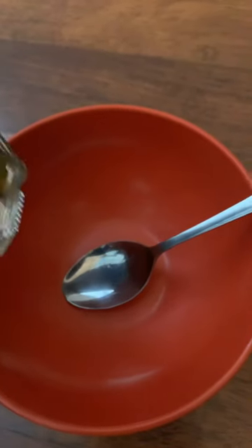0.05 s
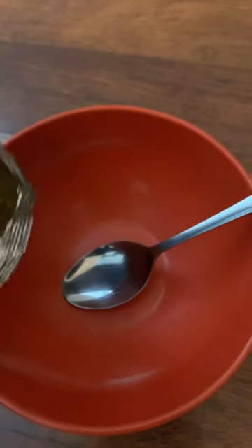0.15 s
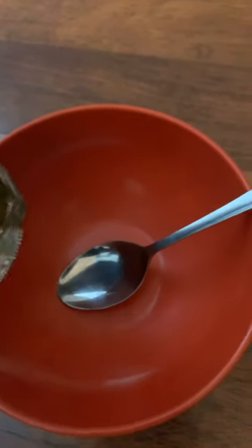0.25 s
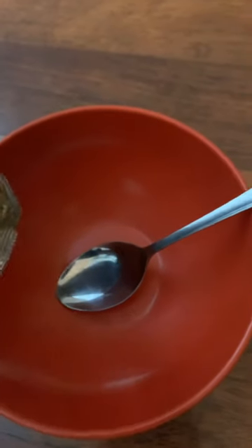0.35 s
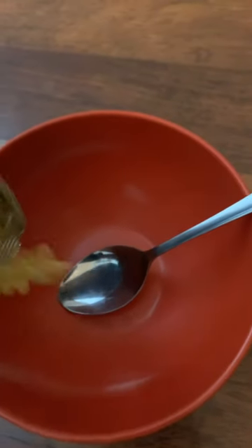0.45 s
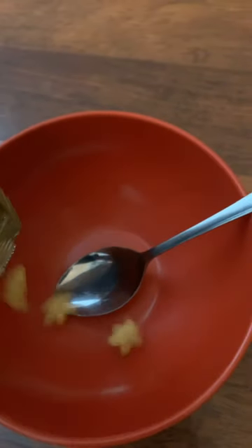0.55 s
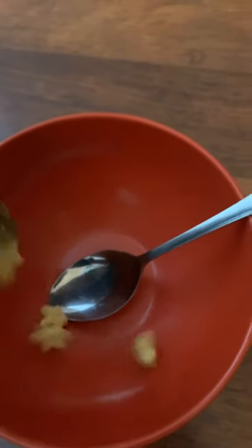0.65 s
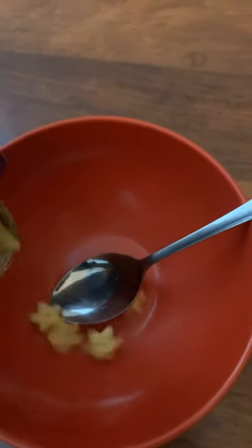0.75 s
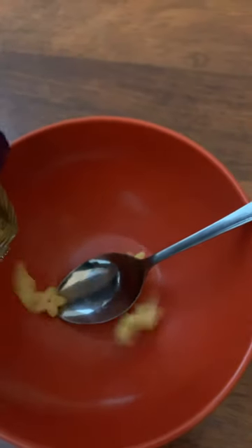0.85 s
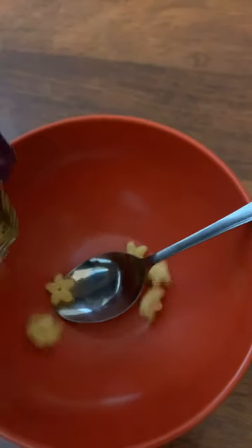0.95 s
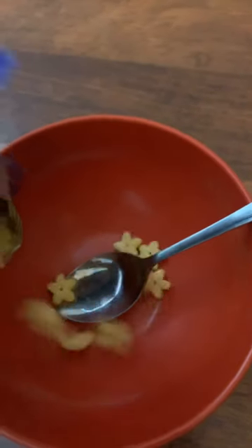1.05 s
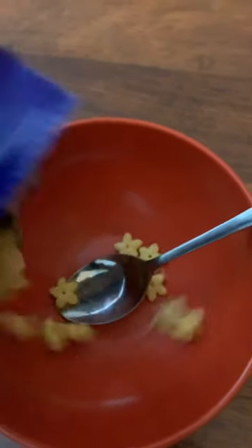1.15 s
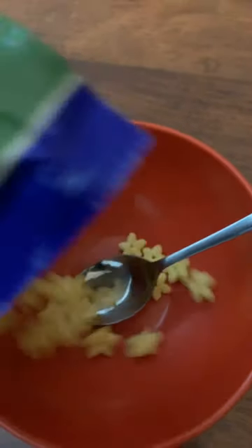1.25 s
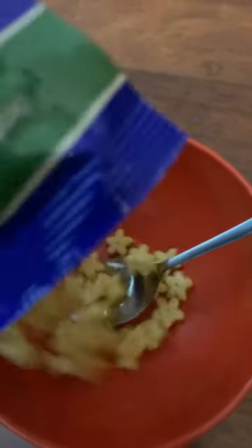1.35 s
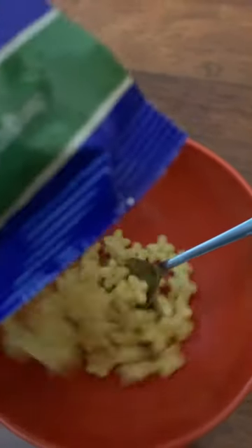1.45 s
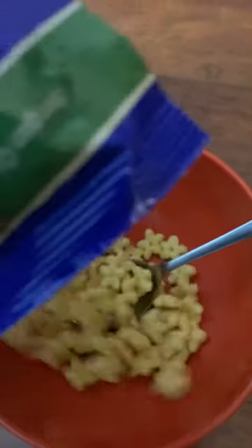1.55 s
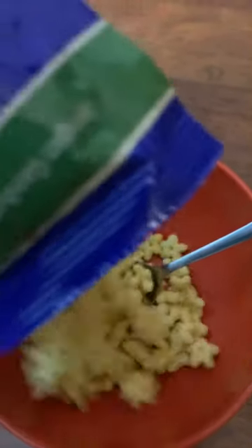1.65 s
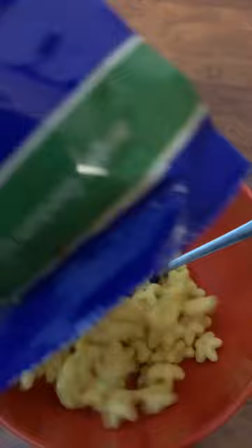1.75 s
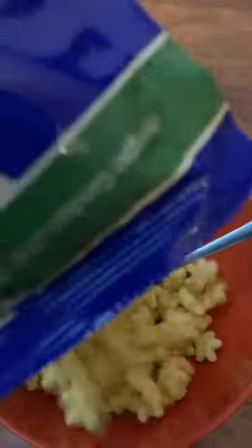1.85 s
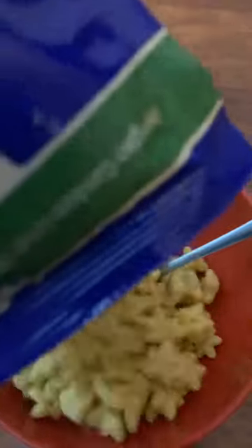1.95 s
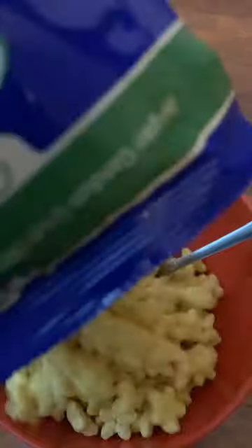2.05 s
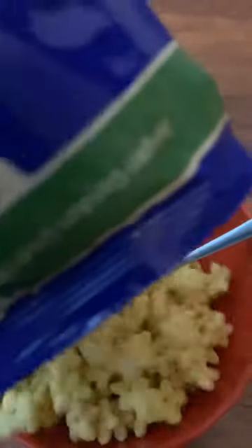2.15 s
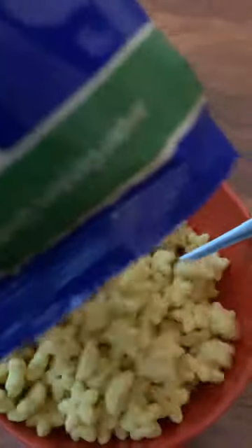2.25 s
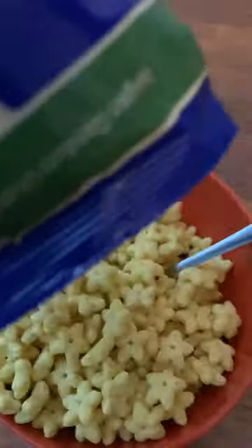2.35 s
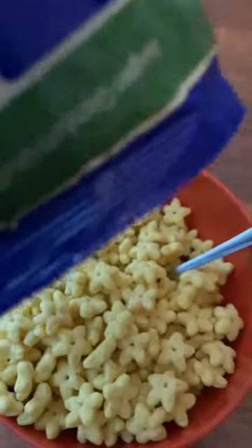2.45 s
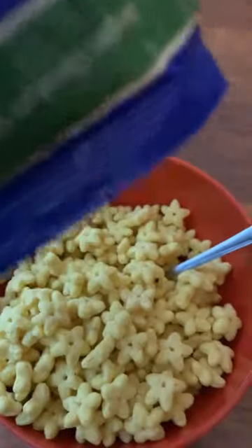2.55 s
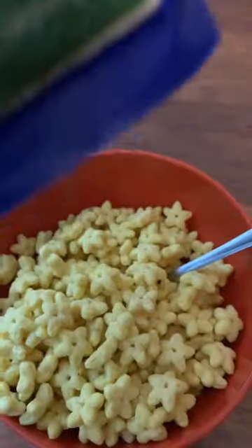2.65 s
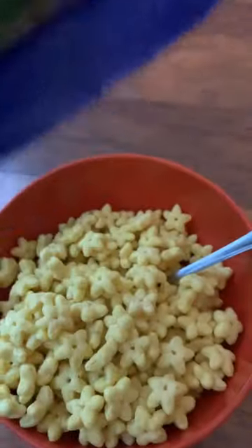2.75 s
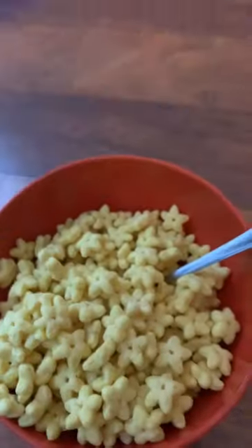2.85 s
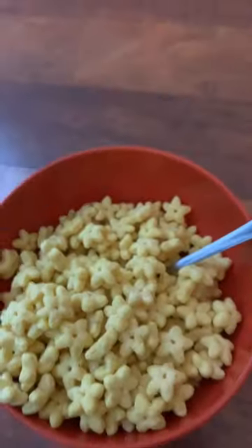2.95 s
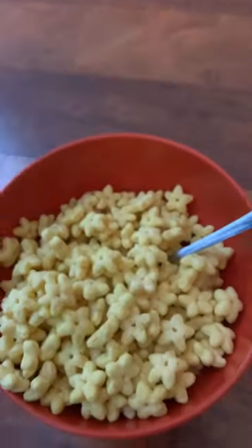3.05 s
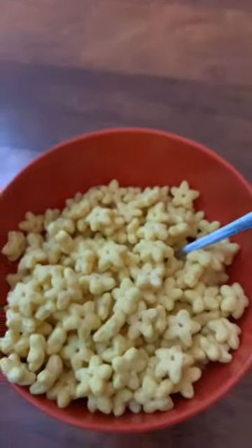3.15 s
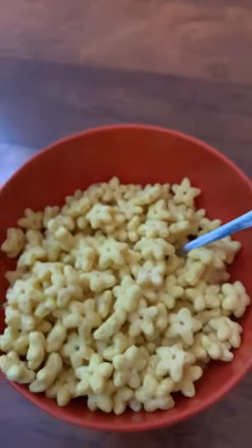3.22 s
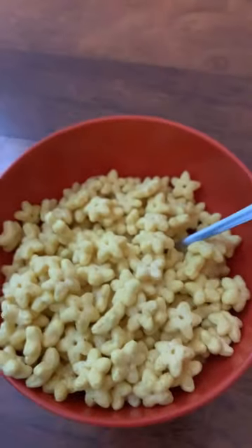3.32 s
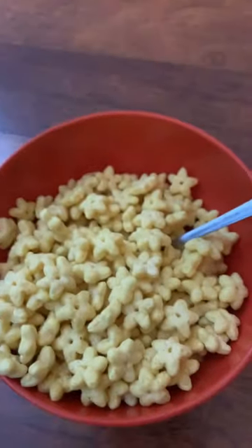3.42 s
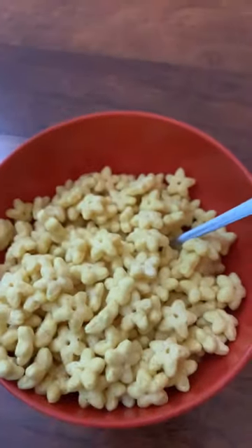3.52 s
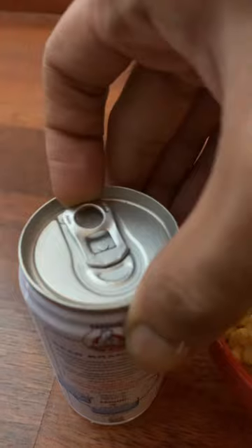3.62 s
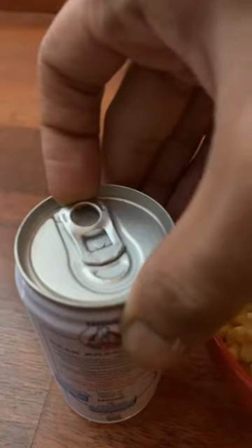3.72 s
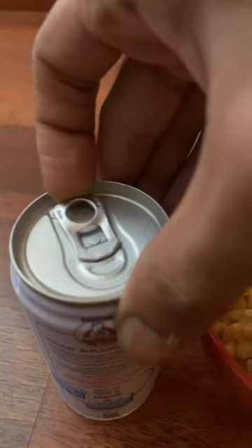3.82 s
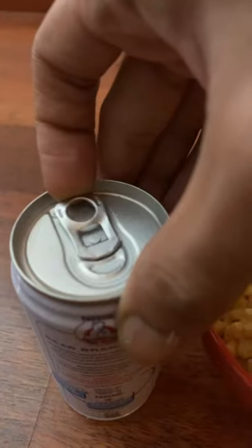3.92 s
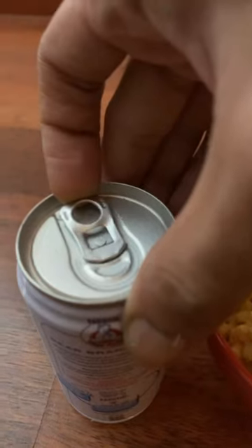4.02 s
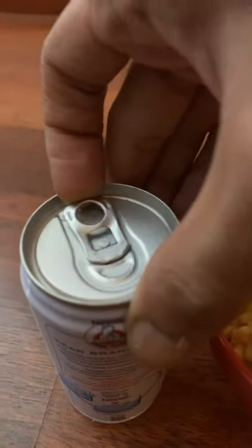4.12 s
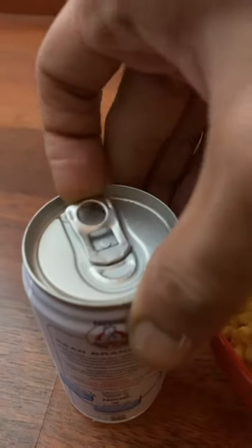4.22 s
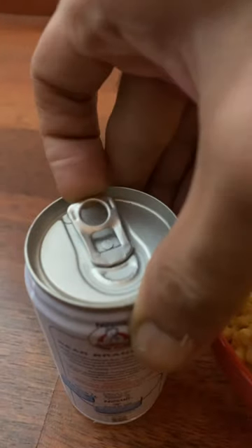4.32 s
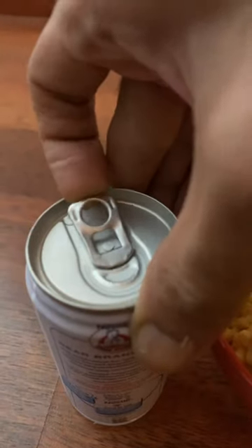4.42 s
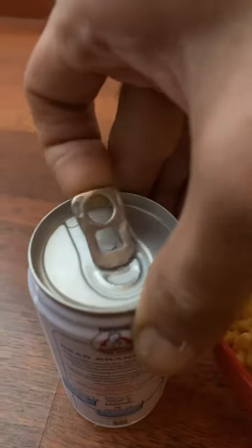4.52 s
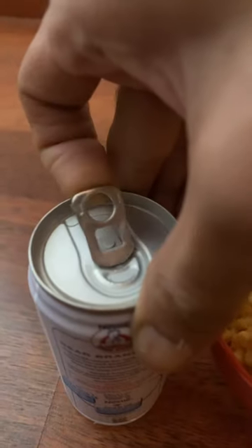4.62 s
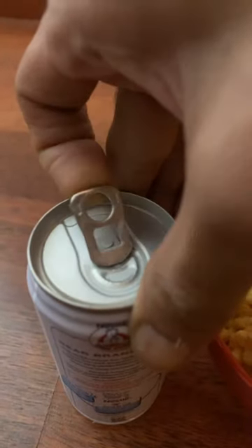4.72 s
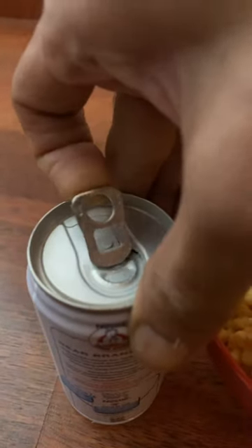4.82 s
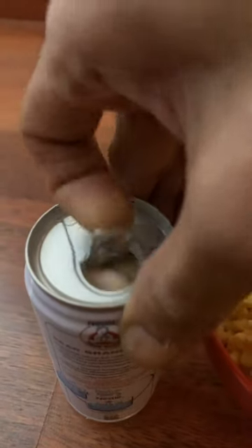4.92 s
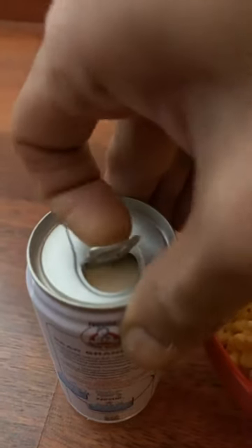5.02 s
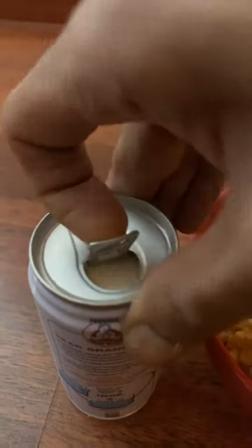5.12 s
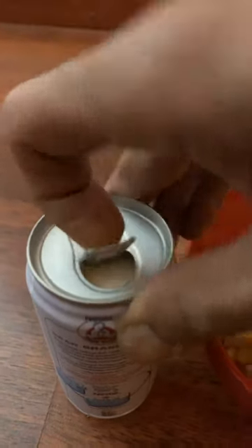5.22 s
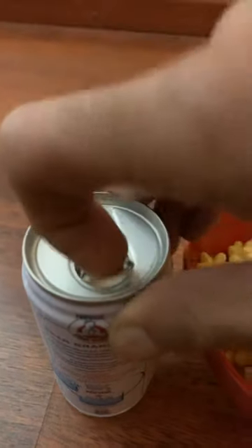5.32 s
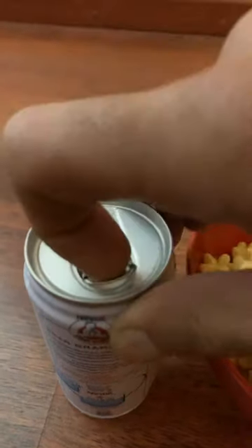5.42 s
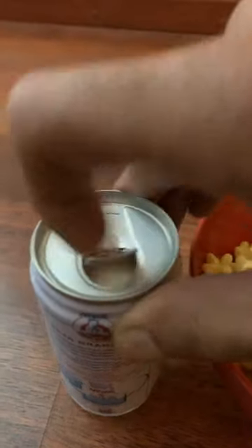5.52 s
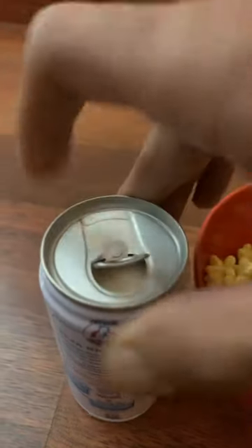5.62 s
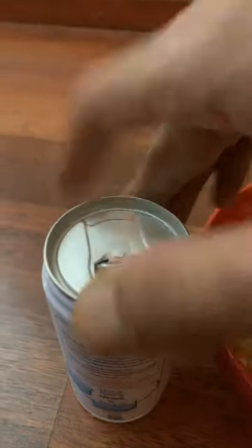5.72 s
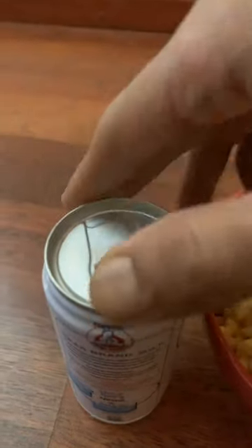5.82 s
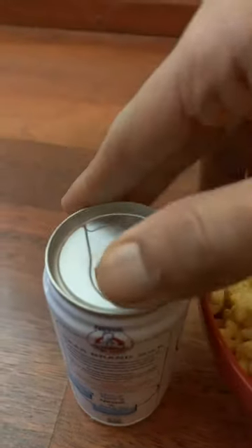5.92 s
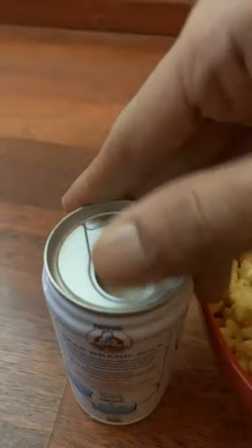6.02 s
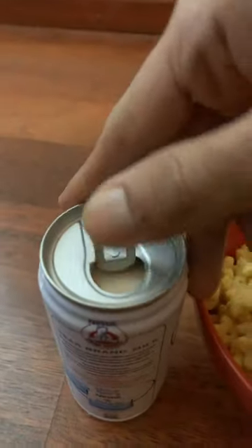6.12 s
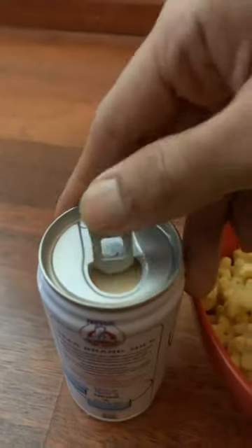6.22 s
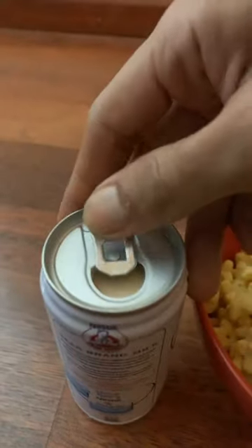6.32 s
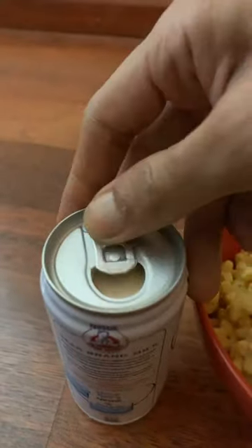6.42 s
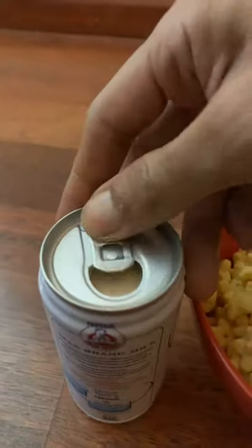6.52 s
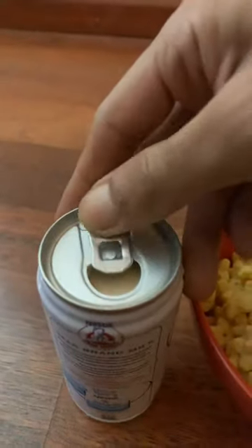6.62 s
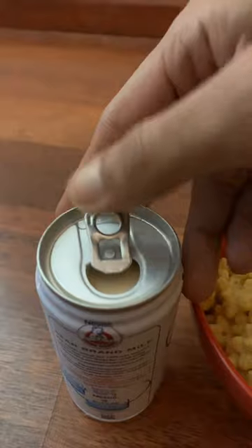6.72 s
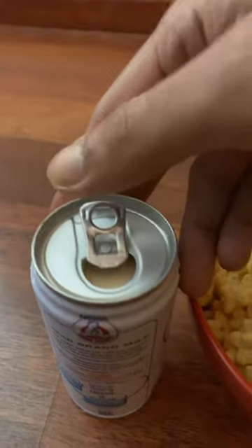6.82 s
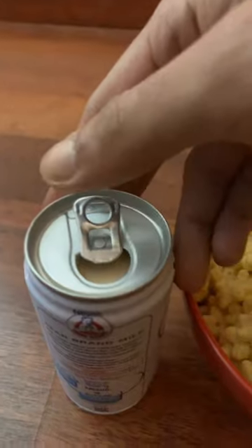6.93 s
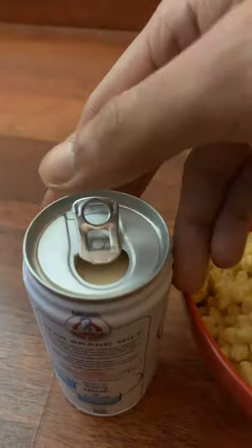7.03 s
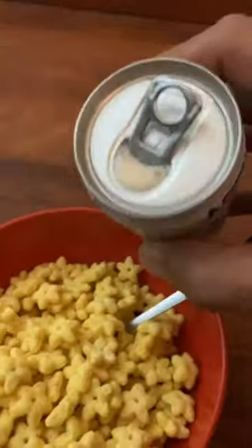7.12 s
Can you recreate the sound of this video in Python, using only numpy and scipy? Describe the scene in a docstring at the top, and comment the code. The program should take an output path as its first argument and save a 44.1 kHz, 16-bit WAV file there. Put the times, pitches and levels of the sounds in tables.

```python
"""Dry cereal rattles into a plastic bowl that holds a steel spoon, on a wooden table.
It slides out of a crackling foil bag: single pieces tick on the bowl and ring the spoon,
then a stream pours down and the growing heap deadens the bowl's ring.
Then a drink can is opened: the seal pops, the lid tears, the tab is bent back.
A small room adds a short echo and a faint hum."""
import sys
import numpy as np
from scipy import signal
from scipy.fft import rfft, irfft
from scipy.io import wavfile
from scipy.ndimage import uniform_filter1d

SR = 44100
rng = np.random.default_rng(int(sys.argv[2]) if len(sys.argv) > 2 else 0)


def put_to_file(sound):
    """Save the sound as 16-bit audio at rate SR, in the file named by the first command-line argument."""
    columns = np.atleast_2d(sound).T  # one column per channel
    safe = np.clip(columns, -1, 1)
    whole_steps = np.round(safe * 32767)
    wavfile.write(sys.argv[1], SR, whole_steps.astype(np.int16))


N = 316197

TRICKLE_S, TIP_S, TIP_TAKES_S = 0.563, 1.146, 0.21  # a trickle lands first, then the bag tips
BURY_S, BURY_TAKES_S = 1.69, 0.12  # the heap covers the bowl

# Table levels are relative. A fade time, or t60, is how long a sound takes to drop by 60 dB.
# how strongly the cereal flows, a shake and then the pour: t/s, level/dB
FLOW = [(0, -51), (.16, -52.5), (.25, -48.5), (.35, -41.5), (.59, -43), (.7, -50), (1.1, -48.5),
        (1.3, -40.5), (1.65, -38.5), (2.02, -37.5), (2.19, -41.5), (2.35, -52.5), (2.57, -73)]
# tone of dry pieces hitting each other: f/Hz, level/dB
CEREAL_TONE = [(900, -36.5), (2300, -9), (3000, -17), (4150, -8), (4650, -9), (4900, -3.5), (6000, 3.5),
               (7500, 1), (8500, -3), (11000, -7), (15500, -16)]
# notes the bowl rings with: f/Hz, level/dB, fade time/s
BOWL_NOTES = [(2400, -11, .045), (3690, -15, .04), (4250, -12, .04), (4890, -4, .05), (4955, -5, .07),
              (5075, -8, .07), (5495, -3, .05), (5630, 0, .025), (5915, -1, .06), (6425, -2, .04),
              (7320, -5, .05), (7580, -1, .03), (7910, -7, .07), (9150, -4, .05)]
def pour(stream_db=9, trickle_db=-12.5, stray_db=-3, single_db=-1, ring_db=-30):
    """Many tiny hits merge into a rattle that rings the bowl, until the heap softens both."""
    flow = level(FLOW)
    stream = sum(signal.oaconvolve(clicks(per_s=20, spread_db=2.4), piece(hz, t60=0.015))[:N]
                 for hz in np.geomspace(4400, 12000, 24))
    stream = normalize(colour(stream * flutter(size=500, depth=0.11), CEREAL_TONE))
    stream *= flow * gain_of(trickle_db * (1 - ramp(TIP_S, TIP_TAKES_S)))
    strays = signal.oaconvolve(clicks(per_s=41, spread_db=-3), piece(6500, t60=0.013))[:N]
    strays = normalize(colour(strays, CEREAL_TONE))
    strays *= flow.max() * (flow / flow.max()) ** 0.92  # rolling pieces stand out in a thin flow
    landing = during(FLOW) * ramp(TRICKLE_S, 0.02) * buried(-4.5)
    hits = (gain_of(stream_db) * stream + gain_of(stray_db) * strays) * landing
    hits += gain_of(single_db) * bouncing_pieces()
    bowl = np.zeros(N)
    for hz, db, t60 in BOWL_NOTES:
        push = gain_of(ring_db) * hits * rng.standard_normal(N)  # each hit lands on a chance spot
        push *= buried(-3.5 * 7500 / hz)  # the heap muffles low notes most
        bowl += signal.oaconvolve(push, ring([(hz, db, t60)], size=4096))[:N]
    return hits + bowl


# pieces loud enough to hear one by one: t/s, level/dB
SINGLE_PIECES = [(0.574, -20.5), (.582, -22.5), (0.59, -21.5), (0.651, -26), (0.673, -24), (.728, -23.5),
                 (0.747, -27.5), (.798, -24), (.926, -22.5), (.937, -21.5), (1.05, -25.5), (1.0779, -18),
                 (1.128, -23.5), (1.1759, -25.5), (1.207, -21.5), (1.229, -25.5), (1.2539, -19),
                 (1.287, -20), (1.333, -18.5), (1.35, -23.5), (1.434, -21), (1.452, -20.5), (1.4826, -19.5),
                 (1.519, -18), (1.552, -17.5), (1.6823, -23), (1.7, -18.5), (1.712, -19.5), (1.8145, -19.5),
                 (2.134, -26.5), (2.162, -20), (2.21, -20.5), (2.2968, -28.5), (2.352, -38), (2.38, -37.5),
                 (2.418, -38.5), (2.466, -37.5), (2.497, -45)]
def bouncing_pieces(gap_s=0.025, gap_shrink=0.57, bounce_db=-6.5):
    """Each piece strikes, then bounces twice, weaker and usually sooner each time."""
    out = np.zeros(N)
    for s, db in SINGLE_PIECES:
        pitch = rng.uniform(5650, 7400)
        bright_db = 7 if s < TIP_S else 0  # the bare bowl sounds brighter
        tone = [(hz, base + bright_db * max(np.log2(hz / 7500), 0)) for hz, base in CEREAL_TONE]
        add(out, s, at_level(colour(piece(pitch, t60=0.041, contrast_db=4.5), tone), db))
        for k in range(2):
            s += gap_s * gap_shrink ** k * rng.uniform(0.6, 1.4)
            add(out, s, at_level(colour(piece(pitch, t60=0.03), tone), db + bounce_db * (k + 1)))
    return out


def piece(hz, t60, width_octaves=0.43, contrast_db=9):
    """One dry piece makes a short crack, strongest near its own pitch."""
    tone = [(hz / 2 ** width_octaves, -contrast_db), (hz, 0), (hz * 2 ** width_octaves, -contrast_db)]
    return normalize(colour(burst(t60, size=4096), tone))


# notes the steel spoon rings with: f/Hz, level/dB, fade time/s
SPOON_NOTES = [(3590, 0, .12), (7460, -2, .1), (10950, -5, .08), (13700, -4, .11), (14020, -2, .15)]
# pieces that land on the spoon: t/s, level/dB
CLINKS = [(0.573, -29), (1.134, -32), (1.23, -39)]
def spoon():
    """A few pieces hit the spoon, and the steel rings high and clear."""
    out = np.zeros(N)
    for s, db in CLINKS:
        add(out, s, at_level(ring(SPOON_NOTES), db))
    return out


# tone of cereal scraping along the bag: f/Hz, level/dB
SCRAPE_TONE = [(59, -30), (100, -6.5), (471, -5), (752, -5.5), (870, -2.5), (1030, -7), (2400, -14),
               (3300, -17.5), (7770, -28), (16000, -45.5)]
# tone of the crackling foil: f/Hz, level/dB
FOIL_TONE = [(1200, -25.5), (3500, -2), (6500, 0.5), (10000, -7.5), (15500, -11.5)]
# how loudly the foil crackles: t/s, level/dB
CRACKLE = [(0, -81), (.12, -60), (.38, -42.5), (.5, -49), (2.1, -41), (2.55, -85)]
# clumps that drop with a hollow thud: t/s, level/dB, f/Hz
CLUMPS = [(.351, -37, 490), (.375, -33.5, 187), (0.987, -35.5, 205), (1.194, -32.5, 178), (1.235, -32, 245),
          (1.276, -30, 294), (1.315, -26.5, 273), (2.003, -32, 421), (2.094, -32, 440)]
def bag(scrape_db=3.5, thud_db=1, top_hz=520, cushion_db_per_octave=-7, clump_t60=0.11):
    """Pieces scrape along the crackling foil and thud softly on its wall and on the heap."""
    scrape = clicks(per_s=2000, spread_db=0) * flutter(size=700, depth=0.24)
    scrape = normalize(colour(scrape, SCRAPE_TONE))
    scrape = colour(scrape, [(90, -7), (240, -0.5)])  # the scrape carries little bass
    pitches = np.geomspace(140, top_hz, 20)
    notes = [ring([(hz, 0, 0.06)], size=4096) for hz in pitches]
    thuds = np.array([signal.oaconvolve(clicks(per_s=9, spread_db=2.5), note)[:N] for note in notes])
    # the first layer of cereal cushions the fall, the deepest thuds most
    layer = ramp(TIP_S + TIP_TAKES_S, BURY_TAKES_S)
    cushion = gain_of(cushion_db_per_octave * np.log2(top_hz / pitches)[:, None] * layer)
    thuds = (thuds * cushion).sum(0) / thuds.sum(0).std()
    thuds = colour(thuds, [(40, -17.5), (160, -0.5)])
    out = (gain_of(scrape_db) * scrape + gain_of(thud_db) * thuds) * level(FLOW)
    crackle = clicks(per_s=1800, spread_db=1) * flutter(size=300, depth=0.62)
    out += normalize(colour(crackle, FOIL_TONE)) * level(CRACKLE)
    for s, db, hz in CLUMPS:
        clump = ring([(hz, 0, clump_t60), (hz * 1.4, -6, clump_t60 * 0.41)])
        clump = colour(clump, [(40, -21.5), (160, -1), (600, -0.5), (2400, -19.5)])
        add(out, s, at_level(clump, db))
    return out * during(FLOW)


# knocks on bag, bowl, table and can: t/s, level/dB, f/Hz, click level against the knock/dB
KNOCKS = [(.176, -35.5, 475, -12), (.846, -33.5, 325, -10), (0.872, -19.5, 155, 2.5), (1.299, -26, 330, -1),
          (2.6, -35, 420, -9), (2.896, -36, 449, -13), (3.471, -45.5, 560, -3), (4.889, -33, 450, -21),
          (5.621, -30.5, 373, -18)]
# notes in one knock: multiple of its pitch, level/dB, fade time/s
KNOCK_NOTES = [(1, -3, .04), (1.3, -6, .012), (2.8, -6, 0.018)]
# taps on the bare wall of the bowl: t/s, level/dB
BOWL_TAPS = [(.776, -28), (.794, -22.5), (0.854, -31.5), (1.3, -27.5)]
def knocks(sag=0.6, sag_s=0.0024):
    """A knock is a click plus dull notes that sag in pitch; a tap rings the bowl's lowest notes."""
    out, t = np.zeros(N), np.arange(4096) / SR
    clock = t + sag * sag_s * (1 - np.exp(-t / sag_s))  # runs fast at first, so the pitch starts high
    for s, db, hz, click_db in KNOCKS:
        body = sum(gain_of(note_db) * fade(t, t60) * np.sin(2 * np.pi * hz * ratio * clock)
                   for ratio, note_db, t60 in KNOCK_NOTES)
        treble_db = 1.7 * click_db - 6.5  # hard knocks are brighter
        click = colour(burst(t60=0.014), [(100, -14), (900, 2.5), (2000, 0.5), (9000, treble_db)])
        add(out, s, at_level(click, db + click_db))
        add(out, s, at_level(colour(body, [(40, -19), (160, 1)]), db))
    for s, db in BOWL_TAPS:
        tick = at_level(piece(BOWL_NOTES[0][0], t60=0.025), 0)
        bowl = at_level(ring(BOWL_NOTES[:2], size=4096), -4.5)
        add(out, s, at_level(tick + bowl, db))
    return out


# notes of the sealed lid as it snaps in: f/Hz, level/dB, fade time/s
SEAL_NOTES = [(1370, 0.5, 0.014), (1720, -3.5, 0.0088), (2800, -11, 0.012), (3920, -3, .007),
              (4200, -2.5, 0.0072), (6230, -16, 0.015)]
# tone of gas rushing through the slit: f/Hz, level/dB
SLIT_TONE = [(200, -26), (1020, -16.5), (1350, 2), (2000, -13.5), (3200, -15), (4000, -4.5), (4800, 0),
             (5500, -13), (6300, -7.5), (8300, -24), (10500, -15.5), (15000, -23.5)]
# drops that spit through the slit: t/s, level/dB
SPITS = [(4.5255, -21.5), (4.5624, -29.5)]
def can_pop(pop_s=4.5083, strain_db=-24, thump_db=-35, puff_db=-22.5, puff_rise_s=0.0061):
    """The seal strains and gives way: the lid snaps, the can thumps the table, gas sputters out."""
    out, t = np.zeros(N), np.arange(16384) / SR
    strain = burst(t60=0.036, size=530)[::-1]  # backwards, so it swells up to the pop
    strain = colour(strain, [(400, -19), (1300, -4), (2400, -1), (4500, -16.5),
                             (6200, -10.5), (9000, -39)])
    add(out, pop_s - len(strain) / SR, at_level(strain, strain_db))
    snap = at_level(ring(SEAL_NOTES), -0.5) + at_level(burst(t60=0.0098), -17.5)
    add(out, pop_s, colour(snap, [(250, -15), (1200, -3.5)]))
    add(out, pop_s, at_level(ring([(55, 3, 0.09), (137, 0.5, 0.22)]), thump_db))
    gas_flow = (1 - np.exp(-t / puff_rise_s)) * flutter(size=100, depth=0.3)[:len(t)]
    puff = colour(burst(t60=0.29) * gas_flow, SLIT_TONE)
    add(out, pop_s + 0.012, at_level(puff, puff_db))
    for s, db in SPITS:
        add(out, s, at_level(colour(burst(t60=0.023), SLIT_TONE), db))
    return out


# notes of the opened lid: f/Hz, level/dB, fade time/s
LID_NOTES = [(760, -14.5, 0.014), (1430, 1, 0.024), (1660, 5.5, 0.018), (2080, 1.5, 0.024),
             (2500, -7.5, .016), (3325, 2, 0.016), (5130, -3, 0.016), (7560, 0, 0.013), (9200, -0.5, 0.009),
             (13500, 0.5, 0.008)]
# slips as the tab tears the lid and is bent back: t/s, level/dB, length/s, brightness/dB
TAB_SLIPS = [(4.759, -40.5, 0.0022, 9), (4.794, -42.5, 0.0046, 2.5), (4.8203, -24.5, 0.0073, 3),
             (4.8855, -9.5, 0.0024, 3.5), (4.8863, -9, 0.0033, 1.0), (4.8884, -9, 0.0035, 0.8),
             (5.078, -33.5, 0.012, -8.5), (5.323, -33, 0.0043, -4), (5.537, -47.5, 0.015, -7),
             (5.557, -36.5, .012, -6.5), (5.565, -31.5, 0.007, -2), (5.906, -54, .008, -6.5),
             (6.482, -43, 0.0062, -.5)]
# notes of the tab springing free of the finger: f/Hz, level/dB, fade time/s
TWANG_NOTES = [(1136, 2, .022), (1070, -12, 0.14), (3000, -15, 0.07), (6420, -16, 0.04)]
def can_tab(rasp_db=-7, chatter=0.48, swell_db=-22, twang_s=5.5715, twang_db=-27.5):
    """The metal slips in one jerk and many tiny ones, which rasp and ring the opened lid."""
    out, t = np.zeros(N), np.arange(4096) / SR
    lid_ring = ring(LID_NOTES)
    for s, db, length, bright_db in TAB_SLIPS:
        swell = burst(t60=0.035, size=620)[::-1]  # a faint, short swell leads into each slip
        add(out, s - len(swell) / SR, at_level(signal.oaconvolve(swell, lid_ring), db + swell_db))
        tiny_jerks = rng.standard_normal(len(t)) * np.exp(-(t / length) ** 2)
        jerks = (t == 0) + chatter * tiny_jerks / np.linalg.norm(tiny_jerks)
        lid = signal.oaconvolve(jerks, lid_ring)[:len(t)]
        rasp = rng.standard_normal(len(t)) * np.exp(-t / length)
        tone = [(125, -16), (1300, 0), (3300, bright_db / 2), (16000, 4 * bright_db)]
        slip = colour(at_level(lid, 0) + at_level(rasp, rasp_db), tone)
        add(out, s, at_level(slip, db))
    add(out, twang_s, at_level(ring(TWANG_NOTES), twang_db))
    return out


# how long the room's echo lasts, from low to high: f/Hz, fade time/s
ECHO_FADES = [(150, 0.42), (700, 0.17), (1500, 0.27), (4500, 0.39), (9000, 0.42), (16000, 0.19)]
def room_echo(x, wall_delay_s=0.0097, early_gain=0.53):
    """Weak early echoes come first, then the walls answer; each pitch dies away at its own pace."""
    t = np.arange(SR // 2) / SR
    echoes = rng.standard_normal(len(t)) * np.where(t > wall_delay_s, 1, early_gain) * (t > 0.002)
    hz, when, bands = signal.stft(echoes, SR, nperseg=256)
    bands = bands * fade(when, value_at(ECHO_FADES, hz)[:, None])
    tail = signal.istft(bands, SR, nperseg=256)[1]
    return signal.oaconvolve(x, tail / np.linalg.norm(tail))[:N]


# tone of the room's low noise: f/Hz, level/dB
RUMBLE_TONE = [(22, -41), (50, -2.5), (110, -4), (200, -12.5), (310, -13.5), (560, -24.5), (800, -25.5),
               (1260, -29.5), (2350, -44), (3700, -44), (6000, -45), (8400, -50.5), (16000, -56)]
# soft hums in the room: f/Hz, width/Hz, level/dB
HUMS = [(99.8, 14, -60.5), (756, 200, -68), (1880, 120, -73), (3140, 230, -86), (4720, 410, -84.5),
        (5400, 240, -88.5)]
def room_noise(rumble_db=-54.5):
    """A quiet, steady rumble with a few hums, each a narrow band of noise."""
    hz = np.fft.rfftfreq(N, 1 / SR)
    noise = lambda shape: normalize(irfft(rfft(rng.standard_normal(N)) * shape, N))
    hums = sum(gain_of(db) * noise(1 / (1 + (2 * (hz - f) / width) ** 4)) for f, width, db in HUMS)
    return gain_of(rumble_db) * noise(gain_of(value_at(RUMBLE_TONE, hz))) + hums


def gain_of(db):
    """Turns decibels into a number to multiply by."""
    return 10 ** (np.asarray(db) / 20)


def normalize(x):
    """Scales a sound to an average power of one."""
    return x / np.sqrt(np.mean(x ** 2) + 1e-20)


def at_level(x, db):
    """Sets the level of the loudest two milliseconds."""
    return gain_of(db) * x / np.sqrt(uniform_filter1d(x ** 2, size=88).max() + 1e-20)


def value_at(points, hz):
    """Reads between the rows of a table that lists values by frequency."""
    f, value = np.transpose(points)
    return np.interp(np.log(hz + 1), np.log(f + 1), value)


def level(curve):
    """Volume over time, from rows of t/s, level/dB."""
    return gain_of(np.interp(np.arange(N) / SR, *np.transpose(curve)))


def during(curve, fade_s=0.02):
    """One while the curve lasts, fading to zero outside."""
    t = np.arange(N) / SR
    return np.clip(1 + np.minimum(t - curve[0][0], curve[-1][0] - t) / fade_s, 0, 1)


def ramp(start_s, length_s):
    """Rises evenly from zero to one, and stays."""
    return np.clip((np.arange(N) / SR - start_s) / length_s, 0, 1)


def buried(db):
    """A volume that changes by db as the heap covers the bowl."""
    return gain_of(db * ramp(BURY_S, BURY_TAKES_S))


def flutter(size, depth):
    """A volume that wanders by chance, changing every `size` samples or so."""
    return np.exp(depth * normalize(uniform_filter1d(rng.standard_normal(N), size=size)))


def fade(t, t60):
    """Dies away by 60 dB every t60 seconds."""
    return 1e-3 ** (t / t60)


def add(mix, s, sound):
    """Mixes a sound in, starting at s seconds."""
    part = mix[round(s * SR):][:len(sound)]
    part += sound[:len(part)]


def colour(x, tone, size=2048):
    """Filters a sound by rows of f/Hz, level/dB, without smearing it earlier in time."""
    db = np.maximum(value_at(tone, abs(np.fft.fftfreq(size, 1 / SR))), -100)
    response = np.exp(np.conj(signal.hilbert(np.log(gain_of(db)))))
    return signal.oaconvolve(x, np.fft.ifft(response).real[:size // 2])[:len(x)]


def ring(notes, size=16384):
    """Pure tones that die away, from rows of f/Hz, level/dB, fade time/s."""
    t = np.arange(size) / SR
    return sum(gain_of(db) * fade(t, t60) * np.sin(2 * np.pi * hz * t) for hz, db, t60 in notes)


def burst(t60, size=16384):
    """Noise that starts at once and dies away."""
    return rng.standard_normal(size) * fade(np.arange(size) / SR, t60)


def clicks(per_s, spread_db):
    """Clicks at random times; a positive spread makes a few louder, a negative one a few softer."""
    size = gain_of(spread_db * np.minimum(rng.exponential(1, N), 3.5))
    return size * rng.choice([-1, 1], N) * (rng.random(N) < per_s / SR)


def scene(cereal_echo_db=-10, pop_echo_db=-16, tab_echo_db=-12, walls=6):
    """Cereal, then the can, both close by; the can sends a different crackle toward each wall."""
    cereal = bag() + pour() + spoon() + knocks()
    echo = np.zeros(N)
    for _ in range(walls):
        can = gain_of(pop_echo_db) * can_pop() + gain_of(tab_echo_db) * can_tab(rasp_db=-1.5)
        echo += room_echo(can) / np.sqrt(walls)
    echo += gain_of(cereal_echo_db) * room_echo(cereal)
    return (cereal + can_pop() + can_tab() + echo + room_noise())[None]


def record(dry):
    """Clips peaks just under full volume, then cuts the highest treble."""
    treble_cut = signal.firwin(401, 15850, window=("kaiser", 9), fs=SR)
    return signal.oaconvolve(np.clip(dry, -0.9, 0.9), treble_cut[None], "same")


dry = scene()
out = record(dry)
put_to_file(out)
```